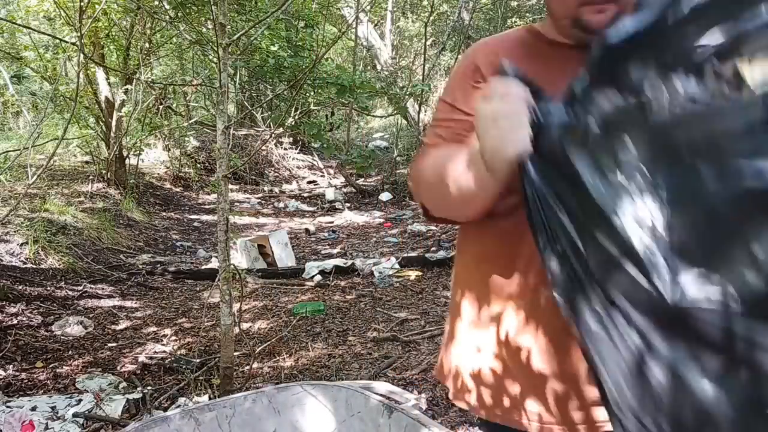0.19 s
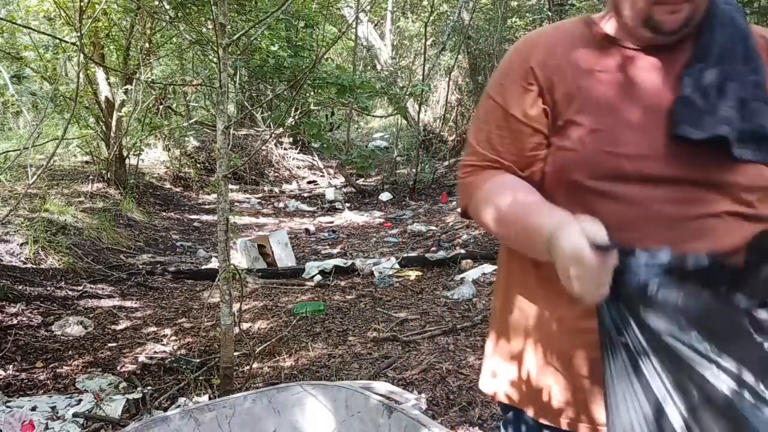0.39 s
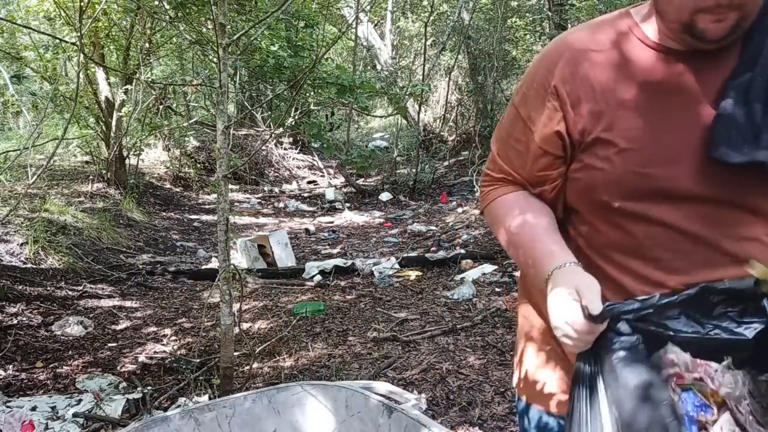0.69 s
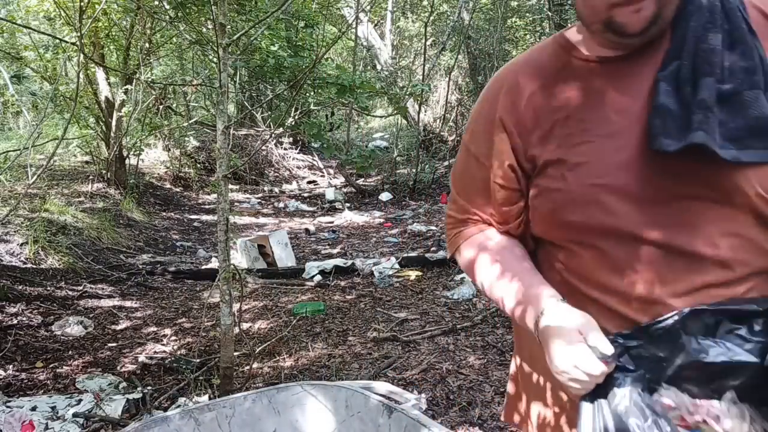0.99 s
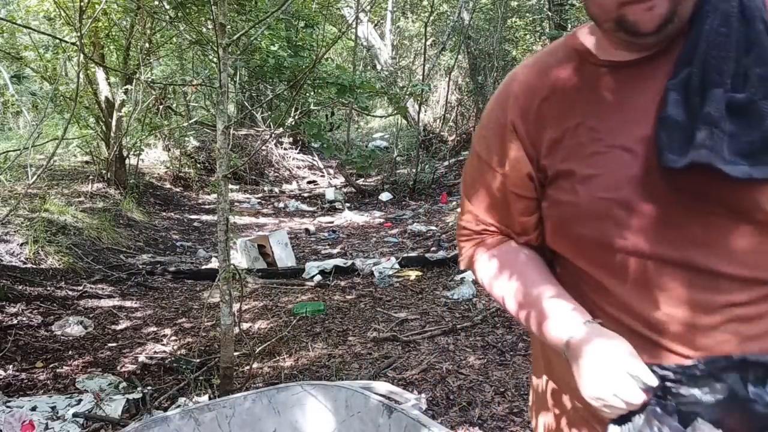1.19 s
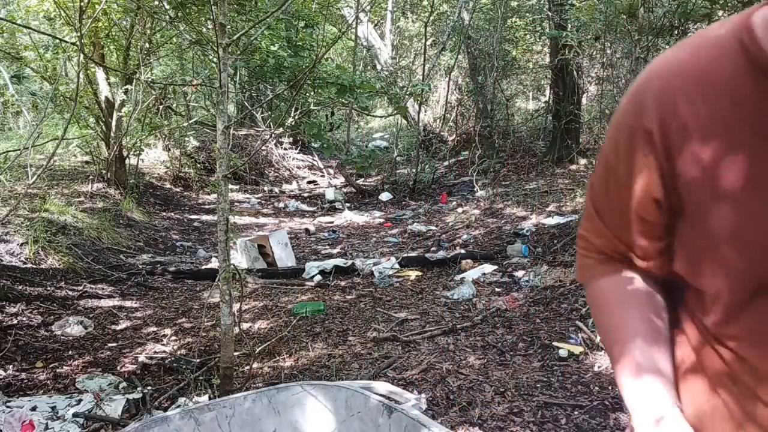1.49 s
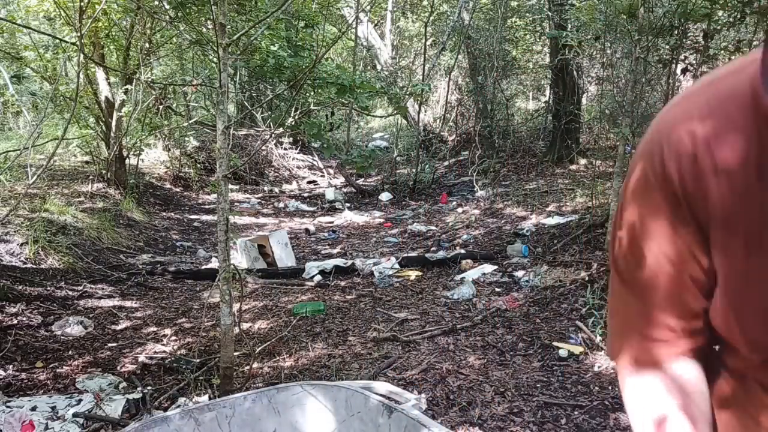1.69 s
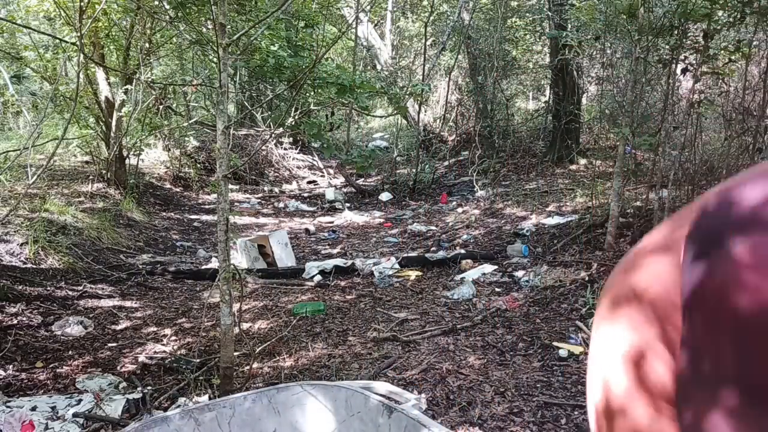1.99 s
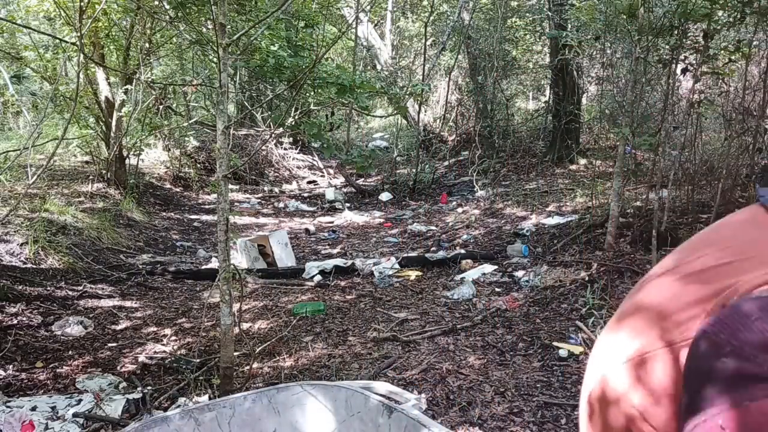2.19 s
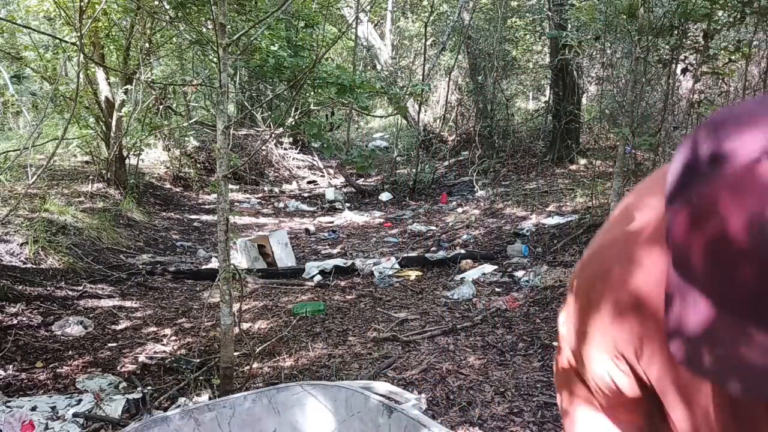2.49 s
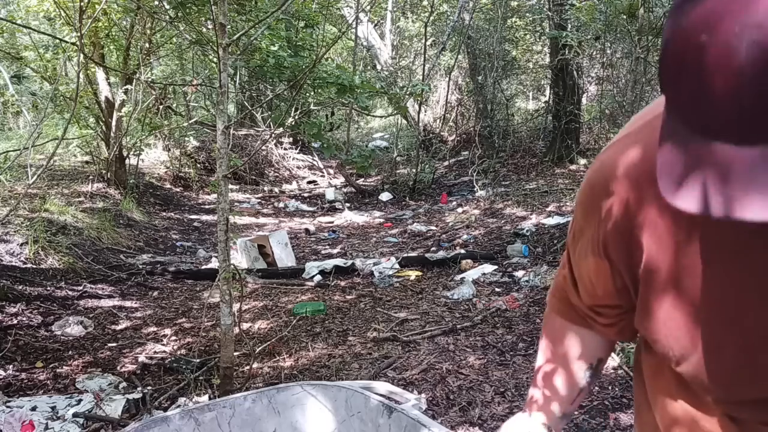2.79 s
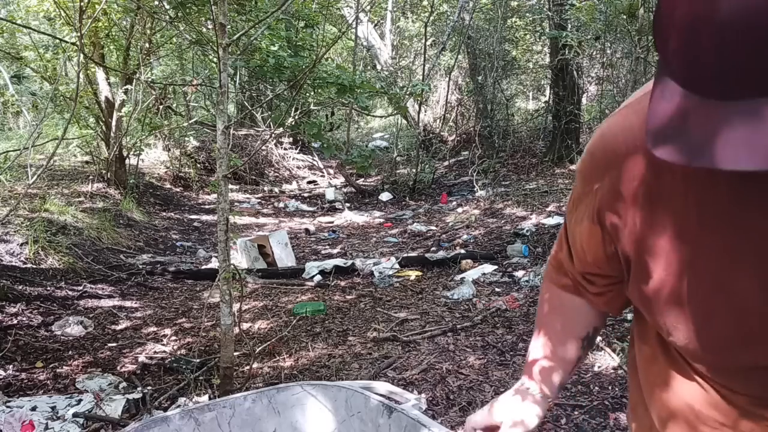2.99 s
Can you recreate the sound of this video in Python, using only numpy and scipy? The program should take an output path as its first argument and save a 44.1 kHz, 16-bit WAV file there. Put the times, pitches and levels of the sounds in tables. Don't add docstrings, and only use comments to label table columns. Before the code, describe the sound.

A thin plastic trash bag crinkles and snaps in uneven bursts, handled close up outdoors

```python
import sys
import numpy as np
from scipy import signal
from scipy.fft import rfft, irfft, next_fast_len
from scipy.io import wavfile
from scipy.ndimage import uniform_filter1d, map_coordinates

SR = 44100
rng = np.random.default_rng(int(sys.argv[2]) if len(sys.argv) > 2 else 0)


def to_linear_factor(level_db):
    exponent = np.asarray(level_db, float) / 20
    return 10 ** exponent


def digitize_waveform(pressure):
    field = np.atleast_2d(pressure).T
    bounded = np.clip(field, -1, 1)
    quanta = np.round(bounded * 32767).astype(np.int16)
    wavfile.write(sys.argv[1], SR, quanta)


N = 136710


def along(points, hz):
    f, v = np.transpose(points)
    return np.interp(np.log(hz + 1), np.log(f + 1), v)


def unit(x):
    return x / np.sqrt(np.mean(x ** 2) + 1e-20)


def wobble(rate):
    return map_coordinates(rng.standard_normal(N // 50), [np.arange(N) * rate / SR])


def filtered(x, response):
    m = next_fast_len(N + 8192)
    return irfft(rfft(x, m) * response(np.fft.rfftfreq(m, 1 / SR)), m)[..., :N]


def closed(points):
    ends = [(points[0][0] / 3, points[0][1] - 30)] + list(points)
    return lambda hz: to_linear_factor(along(ends, hz))


LAG_S, SPREAD_S = 0.000215, 0.0001174


def port_delay(place, side):
    return side * (LAG_S / 2 + SPREAD_S * (2 * place - 1))


# (frequency [Hz], left-right likeness [0..1])
LIKENESS = [(60, .8), (150, .88), (350, .95), (700, .9), (1300, .66), (2200, .5), (3200, .15), (6000, .05)]


def at_ports(pair):
    def mid_side_gains(hz):
        turn = np.arccos(np.clip(along(LIKENESS, hz), 0, 1)) / 2
        return np.array([np.cos(turn), np.sin(turn)])

    mid, side = filtered(pair, mid_side_gains)
    left_right = np.array([mid + side, mid - side])
    return filtered(left_right, lambda hz: np.exp(np.outer([-1j, 1j], np.pi * hz * LAG_S)))


def rush(spectrum, patchy_db):
    z = signal.stft(rng.standard_normal((2, N)), nperseg=256)[2]
    field = rng.standard_normal(z.shape[1:])
    field = uniform_filter1d(field, size=8, axis=0, mode="wrap")
    field = uniform_filter1d(field, size=6, axis=1)
    pair = signal.istft(z * to_linear_factor(patchy_db * unit(field)), nperseg=256)[1][:, :N]
    return unit(at_ports(filtered(pair, closed(spectrum))))


def grains(count, low_hz, high_hz, cycles, size_db, spectrum, size=128):
    at, pitch, big, place = rng.random((count, 4)).T[..., None]
    hz = low_hz + pitch * (high_hz - low_hz)
    gain = to_linear_factor(-size_db * np.log(1.004 - big)) * np.sqrt(hz)
    start, k = (at * N).astype(int), np.arange(size)
    out = []
    for side in (1, -1):
        t = np.clip(k / SR - 8 * SPREAD_S - port_delay(place, side), 0, 1)
        wave = gain * np.sin(2 * np.pi * hz * t) * np.exp(-hz * t / cycles)
        out.append(np.bincount((start + k).ravel(), wave.ravel(), N + size)[:N])
    low_cut = lambda f: f ** 2 / (f ** 2 + low_hz ** 2)
    return unit(filtered(np.array(out), lambda f: closed(spectrum)(f) * low_cut(f)))


# (time [s], handling strength [dB], heaviness: panels over creases [dB])
GESTURES = [
    [(0, -62.5, -21), (.11, -46.5, -26), (.18, -50, -18), (.235, -37, -13), (.3, -32.5, -16),
     (.355, -23, -5.5), (.4, -34, -2.5), (.47, -37, -13.5), (.6, -45, -14)],
    [(.65, -47, -8.5), (.72, -43, -4), (.8, -39.5, -19.5), (.88, -45, -11), (.9, -45.5, -18),
     (.97, -52, -6), (1.15, -48.5, -13.5), (1.3, -53, -11.5), (1.39, -51, -23)],
    [(1.42, -46, -16), (1.5, -40.5, -8), (1.58, -45, -7.5), (1.69, -36.5, -18.5), (1.715, -39, -20),
     (1.745, -34.5, -18), (1.79, -34.5, -12.5), (1.9, -37.5, -1.5), (2.12, -37.5, -0.5), (2.185, -32, -2.5),
     (2.23, -40, -4), (2.27, -51, -4)],
    [(2.295, -49, 4), (2.32, -40, 0), (2.35, -42.5, -6), (2.46, -38.5, -3.5), (2.53, -37.5, -18),
     (2.76, -31, -14.5), (2.8, -33, -8.5), (2.825, -42, -9.5), (2.9, -45.5, -11), (2.95, -41.5, -21),
     (3.1, -41.5, -16)],
]
# (frequency [Hz], level per Hz [dB])
FILM = [(880, -4.5), (1500, -1), (1790, -3), (2330, -4.5), (2920, -4.5), (4160, 0), (6400, -3.5),
        (12300, 0.5), (15600, -0.5)]
# (frequency [Hz], level per Hz [dB])
PANELS = [(40, -4.5), (110, -9), (250, 2.5), (550, 1.5), (1200, 0.5), (2500, -2), (5000, -7.5), (9000, -24)]
# (time [s], top over middle [dB])
TIGHTNESS = [(0, 3), (.2, -3.5), (.37, 0.5), (.5, -0.5), (.9, -1), (1.3, 1), (1.6, -1.5), (1.9, 0),
             (2.2, 2), (2.4, 4.5), (2.6, 1), (2.78, 3.5), (2.85, 4), (3.1, -2.5)]


def rustle():
    now = np.arange(N) / SR
    s, *cols = np.vstack(GESTURES).T
    strength_db, heavy_db = [np.interp(now, s, c) for c in cols]
    strength_db = strength_db + .7 * wobble(24) + 1.1 * wobble(80)

    creases = grains(count=24000, low_hz=1500, high_hz=14900, cycles=1.5, size_db=4.0, spectrum=FILM)
    film = rush(FILM, patchy_db=1.5) + 0.46 * creases
    top = filtered(film, lambda hz: 1 / (1 + (6700 / (hz + 1)) ** 4))
    film = film + top * (to_linear_factor(np.interp(now, *np.transpose(TIGHTNESS))) - 1)

    buckles = grains(count=2500, low_hz=300, high_hz=5270, cycles=0.83, size_db=4.5, spectrum=PANELS, size=768)
    panels = 1.352 * rush(PANELS, patchy_db=3.2) + 0.43 * buckles
    flap_db = 1.4 * wobble(35)
    return to_linear_factor(strength_db + 3.0) * (film + to_linear_factor(heavy_db + flap_db) * panels)


# (frequency [Hz], level per Hz [dB])
WOOD = [(30, -16), (80, -12.5), (300, -25.5), (1000, -25.5), (5000, -20.5), (15000, -26)]


def wood():
    return to_linear_factor(-57) * rush(WOOD, patchy_db=1.5)


# (time [s], peak level [dB], pitch [Hz], left over right [dB])
TICKS = [(0.0075, -35, 5200, 7), (0.3145, -27, 1800, -1), (0.3647, -9.5, 2020, -5), (0.3728, -8, 1870, 3),
         (0.385, -12, 1990, -9), (0.3963, -20, 2400, 9), (0.508, -12, 9000, 0), (0.559, -27, 7700, -2),
         (0.916, -35, 3200, 3), (0.9567, -20, 8400, 4), (1.1053, -37, 1010, 5), (1.1332, -32, 1300, 1),
         (1.3745, -28.5, 4300, -5), (1.616, -28, 1400, -2), (1.6897, -21, 3900, -6), (1.7412, -25, 7600, 1),
         (1.7578, -21, 5000, 1), (1.8097, -16, 1400, -1), (1.8156, -11, 8100, 8), (1.8549, -18, 1270, 5),
         (1.9263, -31, 1200, 0), (1.976, -26, 2020, -2), (1.9804, -25, 1000, -5), (1.9852, -23, 990, 4),
         (2.0374, -21, 2020, 2), (2.045, -17, 1010, -3), (2.0794, -11.5, 1580, -7), (2.0856, -17, 3600, 5),
         (2.0893, -0.5, 4670, 6), (2.1168, -10.5, 4340, 12), (2.1268, -29, 1000, -3),
         (2.1415, -21, 1500, -1), (2.1486, -31, 2100, -7), (2.1649, -28, 1600, 9), (2.1716, -16, 3000, 2),
         (2.1825, -19, 970, -5), (2.191, -10, 4260, 3), (2.221, -25, 2200, -5), (2.231, -27, 1600, -1),
         (2.3018, -19, 1780, 12), (2.366, -25, 4700, -1), (2.392, -28, 2800, -4), (2.3992, -33, 2800, -1),
         (2.4457, -13, 5000, -1), (2.482, -26, 2000, -1), (2.694, -30, 4500, 2), (2.7642, -12.5, 4170, 4),
         (2.798, -17, 3000, 3)]


def ticks():
    life_cycles, level_db, overtone = 1.24, -3, 0.42
    s, db, hz, pan_db = np.transpose(TICKS)[..., None]
    place, ratio = np.hsplit(rng.random((len(TICKS), 2)), 2)
    lead, k = 32, np.arange(256)
    start = np.round(s * SR).astype(int) - lead
    out = []
    for side in (1, -1):
        u = hz * np.clip((k - lead) / SR + .3 / hz - port_delay(place, side), 0, 1)
        high = overtone * np.sin(2 * np.pi * u * (1.71 + ratio))
        wave = (high - np.sin(2 * np.pi * u)) * np.exp(-u / life_cycles)
        wave = to_linear_factor(db + level_db + side * pan_db / 2) * wave
        out.append(np.bincount((start + k).ravel(), wave.ravel(), N)[:N])
    return np.array(out)


# (time [s], peak level [dB], ring pitch [Hz], crack # over
# ring [dB], ring t60 [s])
SNAPS = [(.012, -43.5, 483, -12, 0.013), (.035, -47, 447, -12, 0.015), (0.362, -16, 1500, -6, 0.02),
         (.368, -17.5, 2840, -7, 0.027), (0.378, -24.5, 247, 0, 0.06), (.381, -21, 1010, -4, .025),
         (0.506, -44, 1500, 7.5, 0.022), (.611, -35, 680, -11, 0.016), (.695, -41.5, 300, -14, 0.028),
         (.718, -37.5, 300, -14, 0.04), (.988, -30, 398, -27, 0.015), (1.097, -35, 850, -12, 0.014),
         (1.106, -37, 1400, -3, .012), (1.133, -41.5, 1310, -8, 0.019), (1.277, -44.5, 680, -6, 0.024),
         (1.471, -34.5, 1310, -20, 0.021), (1.487, -36, 2400, -11, .012), (1.796, -26, 1290, -16, .012),
         (1.809, -19.5, 1330, -0.5, 0.012), (1.813, -18.5, 1220, -10, .01), (1.85, -13.5, 1018, -14, 0.02),
         (1.923, -20.5, 694, -22, 0.02), (1.973, -16, 1202, -0.5, 0.019), (1.977, -13.5, 531, -8.5, 0.028),
         (2.039, -12, 534, -4.5, 0.026), (2.077, -18, 1920, -8, 0.0068), (2.089, -6, 250, -19, 0.012),
         (2.1147, -20.5, 770, -6, 0.013),
         (2.148, -47, 2070, -4, .01), (2.163, -21, 1500, -3, 0.015), (2.179, -18, 599, -2.5, 0.022),
              (2.2999, -15.5, 1760, -8, 0.017), (2.303, -20.5, 585, -17, 0.022),
              (2.314, -2.5, 660, -46, 0.0027), (2.363, -26.5, 1100, -5.5, 0.015),
              (2.391, -19.5, 577, -11, 0.016), (2.428, -20, 300, -38, 0.021), (2.436, -29, 409, -28, 0.031),
              (2.444, -32.5, 470, 3, 0.067), (2.463, -24.5, 1210, -10, 0.022),
              (2.483, -20.5, 1700, -11.5, 0.0066), (2.695, -30, 313, 2.5, 0.045),
              (2.791, -26, 1020, -10, 0.026)]
# (ratio to the ring pitch, level [dB])
PARTNERS = [(.62, -9), (1.45, -7), (2.1, -8), (3.3, -11)]
# (frequency [Hz], level per Hz [dB])
CRACK = [(300, 8), (1500, 9), (4500, 6), (6000, 1.5), (7200, 0.5), (13000, -1.5)]


def neighbour_modes(turn, life):
    total = 0
    for ratio, db in PARTNERS:
        level = to_linear_factor(db + rng.normal(0, 4.6) - 30 * ratio * life)
        detune, phase = rng.uniform(0.734, 1.036), rng.uniform(0, 2 * np.pi)
        total = total + level * np.sin(ratio * detune * turn + phase)
    return total


def snaps():
    sag, sag_s = .35, .003
    crack_s, rise_s = .015, .0018
    rings, cracks = np.zeros((2, N + SR)), np.zeros((2, N + SR))
    t = np.arange(SR // 8) / SR
    shake = 1.2 * wobble(300)
    for s, db, hz, crack_db, t60 in SNAPS:
        at = round(s * SR)
        sagging_t = t + sag * sag_s * (1 - np.exp(-t / sag_s))
        turn = 2 * np.pi * hz * sagging_t + shake[at:][:len(t)] - shake[at]
        near = [neighbour_modes(turn, t / t60) for _ in range(2)]
        ring = near + np.outer([1.3, -.2], np.sin(turn))
        ring_env = to_linear_factor(db - 5.5 - 60 * (t / t60) ** 2) * (1 - np.exp(-t / rise_s))
        rings[:, at:][:, :len(t)] += ring_env * ring
        crack_env = to_linear_factor(db + crack_db + 3.0 - 60 * t / crack_s) * (1 - np.exp(-6 * t / rise_s))
        cracks[:, at:][:, :len(t)] += crack_env * rng.standard_normal((2, len(t)))
    return at_ports(rings[:, :N] + filtered(cracks[:, :N], closed(CRACK)))


# (time [s], level [dB], swing pitch [Hz], length t60 [s])
THUDS = [
    (.352, -33, 60, .06),
    (.425, -47, 80, .06),
    (.7, -53, 70, .06),
    (1.97, -42, 70, .06),
    (2.04, -42, 110, .05),
    (2.427, -27, 117, .05),
    (2.72, -51, 60, .07),
]


def thuds():
    out, t = np.zeros(N + SR), np.arange(SR // 4) / SR
    for s, db, hz, t60 in THUDS:
        env = to_linear_factor(db - 60 * (t / t60) ** 2) * (1 - np.exp(-t / .004))
        out[round(s * SR):][:len(t)] -= env * np.sin(2 * np.pi * hz * t)
    return np.outer([.95, 1.05], out[:N])


def scene():
    return rustle() + wood() + ticks() + snaps() + thuds()


def roll_off(x):
    return signal.sosfilt(signal.butter(12, 16820, fs=SR, output="sos"), x)


# (frequency [Hz], left over right [dB])
PORTS = [(60, 1.5), (250, 0.5), (1000, -2), (3000, .5), (6500, 0), (7600, -6), (9200, 5), (12000, 3),
         (15000, 1.5)]


def record(dry):
    full = .55
    x = dry / (1 + np.abs(dry / full) ** 4) ** .25
    x = filtered(x, lambda hz: to_linear_factor(np.outer([.5, -.5], along(PORTS, hz))) * (hz < 15800))
    return roll_off(x)


dry = scene()
out = record(dry)
digitize_waveform(out)
```